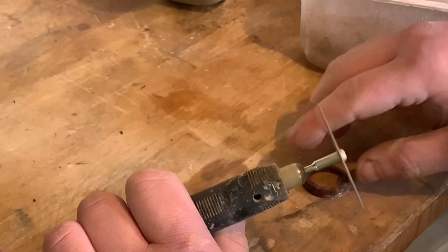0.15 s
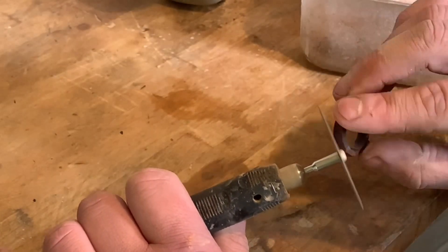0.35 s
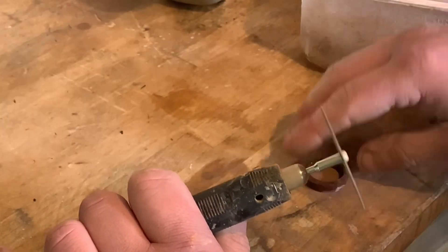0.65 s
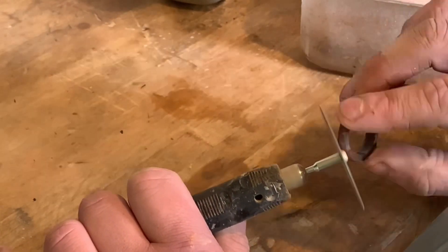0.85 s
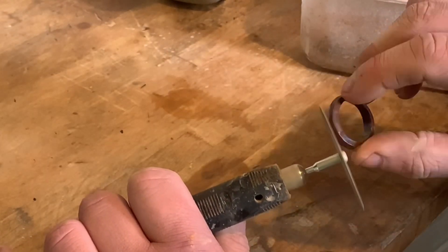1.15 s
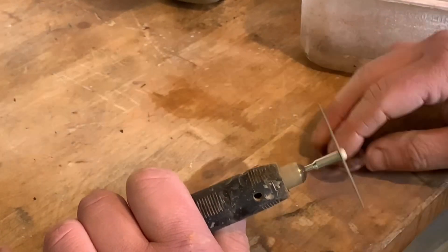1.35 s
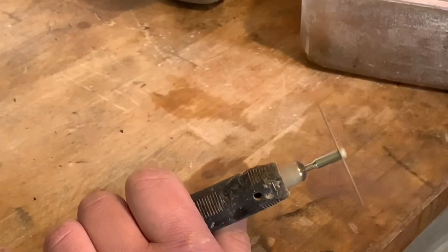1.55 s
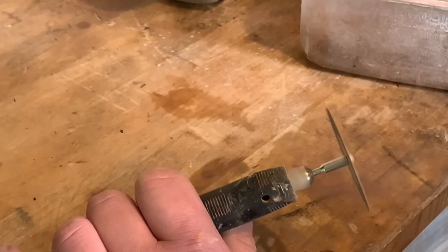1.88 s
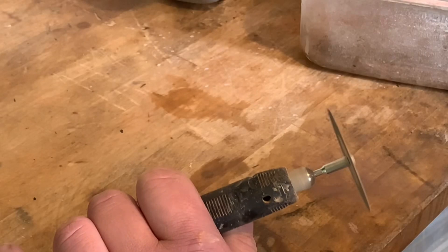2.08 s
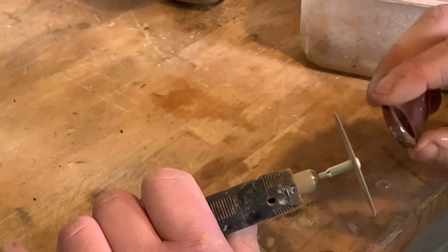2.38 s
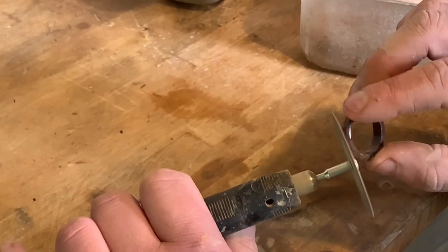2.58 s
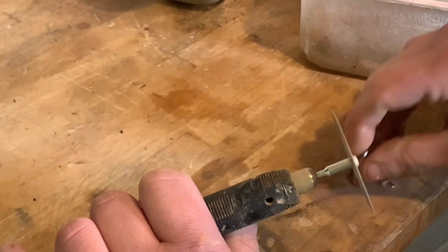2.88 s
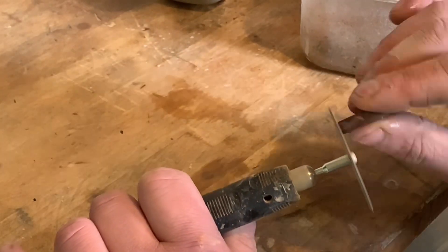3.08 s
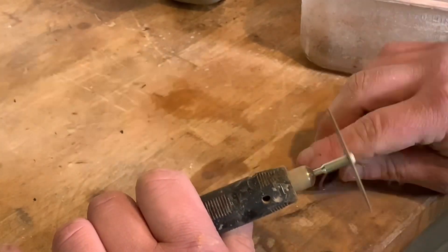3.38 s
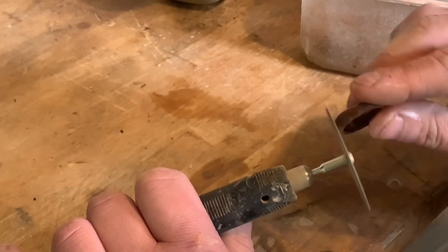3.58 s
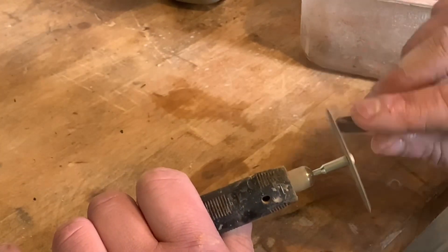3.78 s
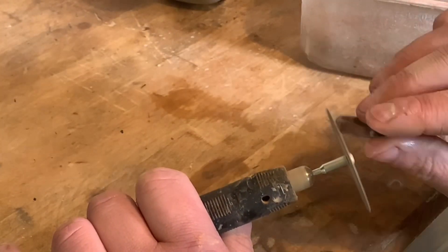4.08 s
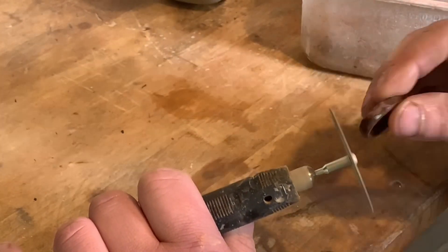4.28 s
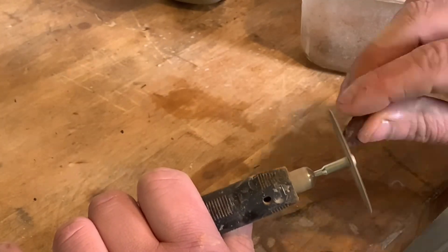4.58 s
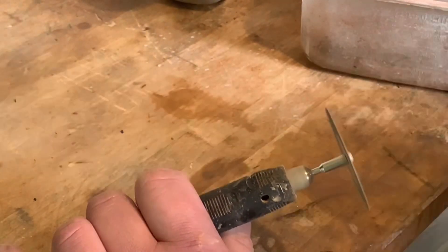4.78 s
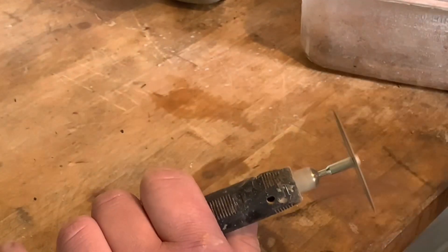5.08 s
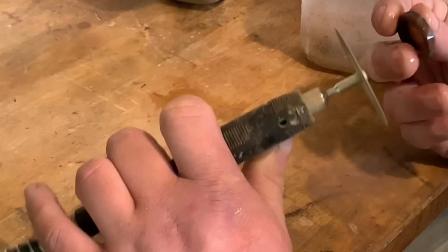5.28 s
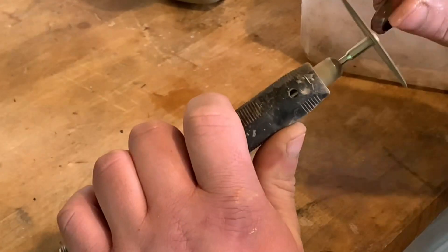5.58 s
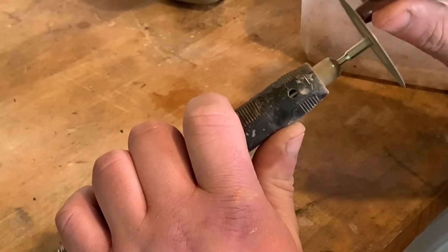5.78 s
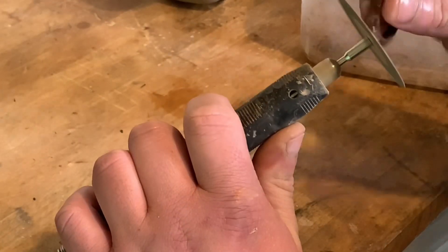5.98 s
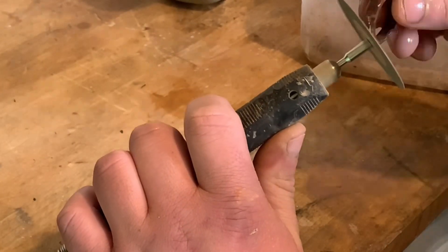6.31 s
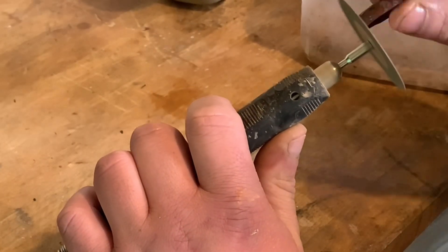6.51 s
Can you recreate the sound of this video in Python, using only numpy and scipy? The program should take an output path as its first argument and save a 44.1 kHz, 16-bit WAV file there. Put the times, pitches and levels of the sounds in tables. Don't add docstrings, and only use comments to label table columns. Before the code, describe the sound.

Close on a workbench, a small handheld rotary tool whines with a buzzy, many-toned hum and bright fan hiss. After about a second a stone ring is pressed to its thin steel disc: gritty, ringing scrapes in stuttering bursts pull the motor pitch down. It springs back to a free-running whine, then a few brief, lighter touches close it. Close stereo microphone, slight low room rumble.

```python
import sys
import numpy as np
from scipy import signal
from scipy.fft import rfft, irfft, next_fast_len
from scipy.io import wavfile
from scipy.ndimage import uniform_filter1d

SR = 44100
rng = np.random.default_rng(int(sys.argv[2]) if len(sys.argv) > 2 else 0)


def dump_mix(stems):
    frames = np.atleast_2d(stems).T
    limited = np.clip(frames, -1, 1)
    pcm = np.round(limited * 32767).astype(np.int16)
    wavfile.write(sys.argv[1], SR, pcm)


def gain_from_decibels(decibels):
    exponent = np.asarray(decibels, float) / 20
    return 10 ** exponent


N = 293265
SLOW = 16
IDLE_HZ = 371
MID_GAP_HZ = (8230, 8930)

# (multiple of shaft speed, level [dB], part of shake, part of hum, part of tilt)
STRONG_ORDERS = [(1, -56.5, 1, -0.056, -0.078), (2, -57.5, 0.4, -0.057, -0.15),
                 (3, -55.5, 0.14, 0.085, -0.08), (4, -51.5, -0.046, 0.94, 0.0038),
                 (5, -59.5, 0.12, 0.55, .01), (6, -52, .2, 0.9, -0.11), (10, -53.5, 0.014, -0.15, 0.98),
                 (13, -53, 0.36, 0.13, 0.028), (7, -53.5, 0.46, -.5, 0.42), (8, -51, .1, -0.0047, -0.29),
                 (9, -58, .01, .01, .01), (11, -56, -.1, .5, -.1), (12, -53.5, -0.14, .3, -0.067),
                 (14, -51.5, -0.01, 0.25, -.1)]
# (multiple of shaft speed, level [dB], left-right [dB], left lead [rad])
IDLE_ORDERS = [(1.0, -53.0, 5.0, 2.1), (1.98, -54.0, 3.1, 0.9), (2.56, -57.5, 6.7, 2.4),
               (3.0, -55.0, 1.5, 1.2), (4.0, -42.0, 3.1, 0.6), (4.56, -55.0, 3.0, 2.3),
               (5.0, -51.0, -1.0, -2.4), (5.76, -52.0, 0.2, 1.6), (6.0, -43.0, -0.2, 1.3),
               (6.52, -57.0, -0.1, 2.2), (7.0, -46.0, 1.0, 2.2), (8.0, -47.0, -1.2, 2.3),
               (9.0, -56.0, -1.4, 1.7), (10.0, -46.0, -2.5, 2.6), (11.0, -49.0, 0.2, 2.4),
               (11.46, -58.0, 0.5, 0.7), (12.0, -52.0, -1.9, -1.8), (12.5, -58.0, -1.0, 0.3),
               (13.0, -45.0, -6.3, -0.5), (13.46, -53.0, -4.8, 1.0), (14.0, -45.0, -5.0, 2.9),
               (15.0, -51.0, -8.3, 3.1), (16.0, -57.0, -4.3, 3.0), (17.0, -57.0, -1.6, 0.0),
               (18.0, -57.0, 1.6, -0.1), (19.0, -58.0, 2.2, -0.9), (20.0, -57.0, 0.8, -1.7),
               (20.44, -57.0, -0.5, -2.5),
               (7.76, -56.5, 0.5, 1.5), (1.97, -57.5, 4.5, 1.66), (9.76, -58, 1.5, 1.5),
               (10.5, -58.5, 1.5, 1.2), (7.04, -51.5, 1.5, 2), (22, -59, 1, -2.9),
               (21, -56, 0, -2.8), (22, -52, 0, -3.1)]
# (time [s], gain [dB])
GAIN_DB = [(0, 0), (1.8, -0.5), (1.95, -2.5), (2.12, 1), (2.3, -3.5), (2.87, -8.5), (2.97, -2.5), (3.6, -2),
           (4.1, 0.26), (6.4, 0.5), (6.65, 1)]
# (frequency [Hz], density [dB per Hz])
FAN_DB = [(200, -27), (350, -9), (1000, -8), (2000, -8), (3300, -10.5), (5000, -6.5), (6300, -10.5),
          (7500, -2.5), (8500, -9.5), (9600, 2.5), (11000, -3.5), (11800, -8), (12300, -87)]
# (frequency [Hz], width [Hz], level [dB])
VENTS = [(1568, 100, -6.5), (1995, 200, 2.5), (2740, 200, 3), (3256, 140, -5), (3980, 150, -7.5),
         (4570, 81, -6), (5440, 220, -1.5)]
# (frequency [Hz], density [dB per Hz])
SCRAPE_DB = [(1200, -33.5), (2000, -7), (3000, -11.5), (4500, -9), (5500, -8.5), (7500, -1), (9000, 1),
             (11000, 0.5), (11900, -3), (12300, -48)]
# (frequency [Hz], width [Hz], level [dB])
DISC_MODES = [(2436, 110, -10.5), (2600, 120, -6.5), (2700, 70, -3), (2820, 32, 7), (2875, 32, 8),
              (3010, 50, -2), (3175, 38, -5), (3517, 110, -5), (3740, 60, -8), (4030, 45, -7.5),
              (4466, 77, -13.5), (8336, 240, -0.5), (9830, 720, -11), (10580, 250, -10)]
# (frequency [Hz], density [dB per Hz])
ROOM_DB = [(12, -60), (20, -52), (91, -14.5), (128, -21.5), (168, -1.5), (228, -8), (275, 0), (331, -11),
           (366, -4.5), (400, -1), (520, -34), (880, -120)]
# (frequency [Hz], share)
ALIKE = [(60, .92), (220, 0.86), (330, .3), (5500, 0.23), (6400, 0.99), (7200, 0.81), (7800, 0.66),
         (8500, 1), (9500, 0.84), (10000, 0.93)]
# (frequency [Hz], left lead [rad])
LEAD = [(300, 0.5), (1000, 0.9), (2500, 3), (4500, -1.5), (6100, 1.5), (6800, 0), (7300, -2.5),
        (7650, -2.5), (8900, -4.5), (9400, -3.5), (10400, -6.5)]
# (frequency [Hz], left-right [dB])
TILT_DB = [(60, -1), (170, -1.5), (500, 2), (1450, 0.5), (4190, -0.5), (12100, -1)]
# (frequency [Hz], share)
STONE_ALIKE = [(330, 0.28), (2800, .65), (3300, 0.94), (5000, 0.78), (5700, 0.13), (6200, 0.92),
               (6800, 0.76)] + ALIKE[5:]
# (frequency [Hz], left lead [rad])
STONE_LEAD = [(300, 2.2), (2700, 2.5), (3250, 0.38), (6100, 0.55)] + LEAD[5:]
# (time [s], turns [Hz])
SPEED_HZ = [(0, 370.3), (1.03, 370), (1.18, 357), (1.5, 339.7), (1.57, 343.7), (1.66, 354.7), (1.76, 338.8),
            (1.94, 330), (2.04, 355.5), (2.085, 363), (2.17, 354.5), (2.25, 338.5), (2.62, 322.7),
            (2.87, 324), (2.95, 352), (3.02, 364), (3.1, 368.7), (3.46, 371.8), (3.8, 370.2), (4.25, 370.7),
            (4.55, 369.8), (6.06, 370.9), (6.15, 368.3), (6.25, 359), (6.33, 366.5), (6.65, 352.3)]
# (time [s], shaft shake [dB], housing hum [dB], tilt to the ports [dB])
GRIP_DB = [(0, 0.5, 0, -3), (.88, -2, -1, 1.5), (.97, 15.5, 3.5, 7), (1.1, 7, 2, 8), (1.4, 5.5, 2.5, 9),
           (1.6, 8.5, 2.5, 5), (1.92, 1, -1.5, -5), (2.2, 4, 2, -5), (2.4, 6, -1, -5), (2.85, 10, 1.5, -2),
           (2.95, 0, -2, 3.5), (3.07, -11, 3, 3), (3.28, -10.5, -2, 5.5), (3.56, -5.5, 6, 6),
           (3.66, -18, 1, 5.5), (3.82, 4, 4, -1.5), (4.03, 2, 2.5, -1), (4.13, -15, 5.5, -1),
           (4.72, -9.5, 5, -6), (4.86, -4, -0.5, 1), (5.3, 0, -2.5, -0.5), (5.9, 2, -4.5, 1),
           (6.16, 1, 3, 3), (6.25, 1, -2.5, 2), (6.36, 1, 0, 1.5), (6.65, 1.5, 3, -3)]
# (frequency [Hz], width [Hz], level [dB])
HOUSING = [(653.8, 38, 0), (682, 23, -8.5), (715, 37, 9.5), (973, 40, -4.5), (1025, 45, 6), (1085, 30, -4),
           (1473, 37, 9), (1762, 85, 12), (2236, 110, 8), (3680, 290, 4), (4820, 120, 8.5)]
# (start [s], length [s], disc ring [dB], swell of the ring [dB], scrape [dB])
PRESSES = [(0.924, 0.19, -59.5, 23, -50.5), (1.149, .03, -44, 1, -39), (1.207, .14, -35.5, 1, -40),
           (1.369, .012, -40, 1, -38), (1.4, 0.088, -43, -4, -39), (1.524, 0.03, -41.5, 1, -38.5),
           (1.636, 0.019, -46.5, 3, -41), (1.665, 0.022, -37.5, 0, -42), (1.706, 0.022, -37.5, 1, -40.5),
           (1.742, 0.1, -36.5, -0.5, -39), (1.852, 0.045, -42.5, 1, -39), (1.9, 0.048, -38, 0.5, -40.5),
           (2.04, .04, -55, 3, -47), (2.095, 0.052, -38.5, 2, -40), (2.154, .13, -38, 1.5, -35.5),
           (2.308, .23, -37.5, 1.5, -36.5), (2.558, .2, -34.5, -1, -38.5), (2.772, 0.087, -34, 1, -37),
           (6.123, 0.037, -40, 0.5, -51), (6.189, 0.018, -45, 3, -46), (6.243, 0.03, -47, 1.5, -40.5),
           (6.327, 0.02, -48.5, -2, -39.5), (6.368, 0.036, -45, -1, -43), (6.424, 0.038, -45, 2, -45),
           (6.514, 0.026, -38.5, -3, -41.5), (6.549, 0.027, -43.5, -6, -43), (6.595, 0.03, -45, -4, -44)]
# (start [s], length [s], multiple of shaft speed, level [dB])
SWELLS = [(1.92, .1, 2, 5), (2.2, .65, 2, 6), (1.58, .14, 2, 2), (2.95, .1, 2, 4), (1.6, .1, 3, 5),
          (1.8, .12, 3, 3), (2.96, .1, 3, 5), (1.98, .15, 1, 3), (6.38, .27, 4, -4), (4.85, .3, 4, -3),
          (2.05, .12, 4, -4), (6.08, .4, 8, -7), (1.0, .18, 8, -4), (2.0, .06, 8, -8), (4.15, 1.9, 2, 3),
          (0, 1, 3, 2), (1.25, .3, 3, -6), (1.95, .5, 3, -7), (6.2, .45, 3, 5), (1.1, .2, 4, -4),
          (4.3, .5, 4, 2), (6.22, .08, 4, -6), (6.2, .3, 5, 5), (3.8, .6, 6, 2), (4.7, .3, 6, 4),
          (5.8, .3, 6, -5), (0, .25, 7, 6), (3, .2, 7, 7), (3.4, .25, 7, 5), (4, .5, 7, -5), (5, .6, 7, 6),
          (5.85, .25, 7, 5), (1.2, .38, 9, 12), (1.7, .25, 9, 10), (2.2, .65, 9, 4), (6.2, .45, 9, 9),
          (.4, .4, 10, -5), (3.37, .24, 10, 8), (3.04, .06, 12, 9), (2.09, .12, 8, -4), (2.6, .27, 7, -5),
          (2.05, .14, 2, -3), (2.95, .15, 6, 3), (6.4, .25, 10, 4), (1.0, .15, 13, -7), (3.3, .12, 13, 5),
          (4.8, .1, 13, 5)]
# (frequency [Hz], level [dB])
STEP_MARGIN_DB = [(200, 16), (800, 16), (1200, 10), (1600, 3.5), (2300, 2.5), (3000, 1.5), (4000, 2),
                  (5200, 4), (6500, 2), (7200, 3), (7900, -1.5), (8600, 5), (9300, 5), (10800, 7)]
# (frequency [Hz], level [dB])
STEP_FLOOR_DB = [(10500, -69.5), (11300, -51), (11900, -38)]
BAND_EDGES = np.r_[0:40:4, 40:96:8, 96:144:12, 144, 160, 176, 196, 216, 240, 264, 292, 320:960:32, 1024]
# (lowest [Hz], highest [Hz])
TOP_HZ = [(11600, 12130), (9850, 10330)]
# (lowest [Hz], highest [Hz])
GAP_TOP_HZ = (8930, 9330)


def unit(x):
    return x / np.sqrt(np.mean(x ** 2) + 1e-20)


def along(points, hz):
    f, v = np.transpose(points)
    return np.interp(np.log(hz + 1), np.log(f + 1), v)


def peaks_db(table, hz):
    return sum(db / (1 + (2 * (hz - c) / w) ** 2) for c, w, db in table)


def curves(rows):
    s, *cols = np.transpose(rows)
    return [np.interp(np.arange(N) / SR, s, c) for c in cols]


def wobble(rate_hz, step=1):
    knots = rng.standard_normal(int(N * rate_hz / SR) + 4)
    return np.interp(np.arange(0, N, step) * rate_hz / SR, np.arange(len(knots)), knots)


def smooth_noise(shape, frames, axis=-1):
    return unit(uniform_filter1d(rng.standard_normal(shape), size=frames, axis=axis))


def filtered(x, response):
    m = next_fast_len(N + 8192)
    return irfft(rfft(x, m) * response(np.fft.rfftfreq(m, 1 / SR)), m)[..., :N]


def ports(versions, spectrum, alike=ALIKE, lead=LEAD):
    side = np.array([[.5], [-.5]])

    def share(hz):
        return np.clip(along(alike, hz), 0, 1)

    def tilted(hz):
        return spectrum(hz) * gain_from_decibels(side * along(TILT_DB, hz))

    def common(hz):
        return tilted(hz) * np.sqrt(share(hz)) * np.exp(1j * side * along(lead, hz))

    both = filtered(versions[0], common)
    own = filtered(versions[1:], lambda hz: tilted(hz) * np.sqrt(1 - share(hz)))
    return unit(both + own)


def workshop(gain_db):
    rumble = ports(rng.standard_normal((3, N)), lambda hz: gain_from_decibels(along(ROOM_DB, hz)) * (hz < 400))
    return gain_from_decibels(-54 + 1.5 * gain_db) * rumble


def fan(turns, gain_db):
    beat = 1 + .05 * np.cos(2 * np.pi * turns)
    air = rng.standard_normal((3, N)) * beat * gain_from_decibels(.7 * wobble(60))
    hiss = ports(air, lambda hz: gain_from_decibels(along(FAN_DB, hz) + peaks_db(VENTS, hz)))
    return gain_from_decibels(-32.5 + gain_db + 0.27 * wobble(4.9)) * hiss


def swells(order):
    edge_s = .03
    t = np.arange(0, N, SLOW) / SR
    return sum(db * np.clip(np.minimum(t - s, s + length - t) / edge_s + .5, 0, 1)
               for s, length, k, db in SWELLS if round(k) == order)


def strong_orders(slow_speed, slow_gain_db):
    shake_db, hum_db, tilt_db = (c[::SLOW] for c in curves(GRIP_DB))
    levels = {}
    for order, db, shake, hum, tilt in STRONG_ORDERS:
        k = round(order)
        grip_db = shake * shake_db + hum * hum_db + tilt * tilt_db
        unrest_db = (.8 + .17 * k) * wobble(9, SLOW)
        levels[k] = db + slow_gain_db + grip_db + peaks_db(HOUSING, k * slow_speed) + swells(k) + unrest_db
    return levels


def whine(turns, speed, gain_db):
    loose_orders, loose_rad = (2, 3, 7, 12), .6
    gain_db = (gain_db - .007 * np.clip(np.gradient(speed) * SR, 0, None))[::SLOW]
    strong = strong_orders(speed[::SLOW], gain_db)
    slowing = np.clip(IDLE_HZ - speed[::SLOW], 0, None)
    idling = np.clip(1.25 - slowing / 8, 0, 1)
    out = np.zeros((2, N))
    for order, db, pan_db, lead_rad in IDLE_ORDERS:
        whole = round(order)
        off = abs(order - whole)
        bearing = off > .025
        if bearing:
            drift_rad = 1.2
        else:
            drift_rad = .04 * whole + loose_rad * (whole in loose_orders) * idling + 0.006 * whole * slowing
        jitter = drift_rad * wobble(40, SLOW) + rng.uniform(0, 2 * np.pi)

        left = gain_from_decibels(pan_db / 2) * np.exp(1j * (lead_rad + .2 * wobble(3, SLOW)))
        right = gain_from_decibels(-pan_db / 2)
        mid, side = (left + right) / 2, (left - right) / 2

        fade = 0.073 * min(order - 4, 5.1) if bearing else 0.097 + .008 * whole
        mid_db = db + 2.0 + gain_db - fade * slowing
        mid_db = mid_db + 2 * wobble(4, SLOW) + (2 + 0.077 * slowing) * wobble(25, SLOW)
        if bearing and off < .05:
            mid_db = mid_db - 20 * (1 - idling)
        side_db = mid_db
        if not bearing and whole in strong:
            breakup_db = 1.1 + 0.081 * slowing * min(whole / 5, 1)
            mid_db = strong[whole] - 20 * np.log10(np.maximum(abs(mid), .25)) + breakup_db * wobble(25, SLOW)
            side_db = (side_db + mid_db) / 2

        mid, side = mid * gain_from_decibels(mid_db), side * gain_from_decibels(side_db)
        swing = np.array([mid + side, mid - side]) * np.exp(1j * jitter)
        swing = np.repeat(swing, SLOW, axis=1)[:, :N].astype(np.complex64)
        angle = (2 * np.pi * ((order if bearing else whole) * turns % 1)).astype(np.float32)
        out += np.sqrt(2) * (swing.real * np.cos(angle) - swing.imag * np.sin(angle))
    return out


def pressure():
    bite_db_per_s, lift_db_per_s = 606, 700
    start, length, ring_db, swell_db, scrape_db = np.transpose(PRESSES)[..., None]
    t = np.arange(0, N, SLOW) / SR - start
    away_db = bite_db_per_s * np.minimum(t, 0) - lift_db_per_s * np.maximum(t - length, 0)
    grown_db = swell_db * np.clip(t / length, 0, 1)
    levels = [ring_db + grown_db, scrape_db, ring_db + 4 + 0.67 * grown_db]
    return [np.repeat((db + away_db).max(0), SLOW)[:N] for db in levels]


def disc_modes(hz):
    return sum((-1) ** k * gain_from_decibels(db) * 1j * hz * w / (c * c - hz * hz + 1j * hz * w)
               for k, (c, w, db) in enumerate(DISC_MODES))


def steadied(ring):
    core = filtered(ring, lambda hz: (hz > 2740) & (hz < 2960))
    power = abs(uniform_filter1d(core.sum(0) ** 2, size=700))
    evening = (power / power.mean() + .05) ** (-.7 / 2)
    stutter = gain_from_decibels(2.5 * wobble(70))
    return ring + core * (evening * stutter - 1)


def grinding(turns, gain_db):
    ring_db, scrape_db, chatter_db = pressure()
    spot = np.exp(3 * np.cos(2 * np.pi * turns))
    grit = rng.standard_normal((6, N)) * (1 + 0.012 * spot)
    ring_grit_db = 1.6 * wobble(45) + 0.81 * wobble(300)
    scrape_grit_db = 1.2 * wobble(45) + 0.66 * wobble(300)
    grit = grit * gain_from_decibels(np.repeat([ring_grit_db, scrape_grit_db], 3, axis=0))
    ring = steadied(ports(grit[:3], disc_modes, STONE_ALIKE, STONE_LEAD))
    scrape = ports(grit[3:], lambda hz: gain_from_decibels(along(SCRAPE_DB, hz)), STONE_ALIKE, STONE_LEAD)

    knock = np.diff(np.floor(turns), prepend=0) * gain_from_decibels(0.26 * wobble(200))
    knocks = np.array([knock, np.roll(knock, 31), np.roll(knock, 77)])
    chatter = ports(knocks, lambda hz: disc_modes(hz) + 0.3 * (hz > 1500) * (hz < 6000),
                    STONE_ALIKE, STONE_LEAD)
    chatter = gain_from_decibels(chatter_db + 0.63 * gain_db) * chatter
    return gain_from_decibels(ring_db + 5.0) * ring + gain_from_decibels(scrape_db + 8) * scrape + chatter


def scene():
    speed = uniform_filter1d(curves(SPEED_HZ)[0], size=1500, mode="nearest")
    gain_db, = curves(GAIN_DB)
    flutter_hz = .08 * np.clip(IDLE_HZ - speed, 0, 25) * wobble(45)
    turns = np.cumsum(speed + .5 * wobble(12) + flutter_hz) / SR
    tool = fan(turns, gain_db) + whine(turns, speed, gain_db)
    return workshop(gain_db) + tool + grinding(turns, gain_db)


def coarse_steps(pair):
    hop, grid = 1024, 394
    rise = np.cumsum(np.kaiser(hop + 1, 4 * np.pi))
    half = np.sqrt(rise[:-1] / rise[-1])
    n, k = np.arange(2 * hop)[:, None], np.arange(hop)
    window = np.r_[half, half[::-1]][:, None]
    basis = window * np.cos(np.pi / hop * (n + .5 + hop / 2) * (k + .5)) * np.sqrt(2 / hop)
    count = N // hop + 3
    blocks = np.pad(pair, ((0, 0), (2 * hop - grid, (count - 1) * hop - N + grid))).reshape(2, -1, hop)
    c = np.concatenate([blocks[:, :-1], blocks[:, 1:]], axis=2) @ basis

    width = np.diff(BAND_EDGES)
    band_hz = (BAND_EDGES[:-1] + BAND_EDGES[1:]) * SR / (4 * hop)
    power = np.add.reduceat((c ** 2).sum(0), BAND_EDGES[:-1], axis=1) / width
    power = power + .25 * (np.roll(power, 1, axis=1) + np.roll(power, -1, axis=1))
    step = np.sqrt(power) * gain_from_decibels(.8 * rng.standard_normal(power.shape) - along(STEP_MARGIN_DB, band_hz))
    step = step + gain_from_decibels(along(STEP_FLOOR_DB, band_hz))
    step = step * gain_from_decibels(2.2 * smooth_noise((len(step), 1), 3, axis=0))
    step = step * gain_from_decibels(2.2 * smooth_noise(step.shape, 6, axis=0))
    step = np.repeat(step, width, axis=1)
    c = np.sign(c) * step * np.floor(abs(c / step) ** (3 / 4) + .4054) ** (4 / 3)

    bin_hz = k * SR / (2 * hop)
    frames = c.shape[1]
    top_hz = np.array([(lo + hi) / 2 + (hi - lo) / 3 * smooth_noise(frames, 3) for lo, hi in TOP_HZ])
    c = c * (bin_hz < top_hz[..., None])
    resume_hz = np.mean(GAP_TOP_HZ) + np.ptp(GAP_TOP_HZ) / 3 * smooth_noise((frames, 1), 3, axis=0)
    c[0] *= (bin_hz < MID_GAP_HZ[0]) | (bin_hz > resume_hz)

    back = c @ basis.T
    blocks = back[:, :-1, hop:] + back[:, 1:, :hop]
    return blocks.reshape(2, -1)[:, hop - grid:][:, :N]


def within(hz, low_hz, high_hz):
    return (hz > low_hz) & (hz < high_hz)


def mid_response(hz):
    return ~within(hz, *MID_GAP_HZ) * gain_from_decibels(-3.4 * within(hz, 7580, 9000))


def side_response(hz):
    low = np.where(hz < 90, .6, .25)
    return np.where(hz < 260, low, gain_from_decibels(-3.5 * within(hz, 6250, 7000)))


def roll_off(x):
    return signal.sosfilt(signal.butter(12, 12730, fs=SR, output="sos"), x)


def record(dry):
    mid = filtered((dry[0] + dry[1]) / 2, mid_response)
    side = filtered((dry[0] - dry[1]) / 2, side_response)
    mid, side = coarse_steps(np.array([mid, side]))
    return roll_off(np.array([mid + side, mid - side]))


dry = scene()
out = record(dry)
dump_mix(out)
```